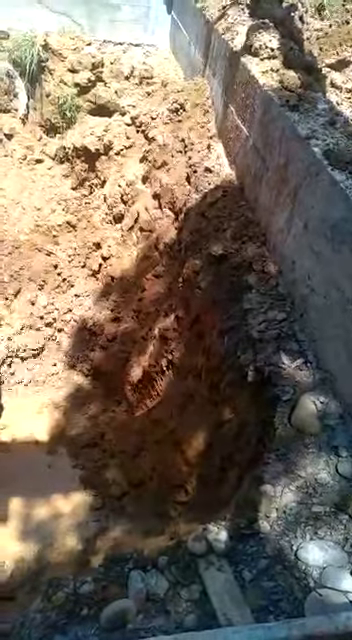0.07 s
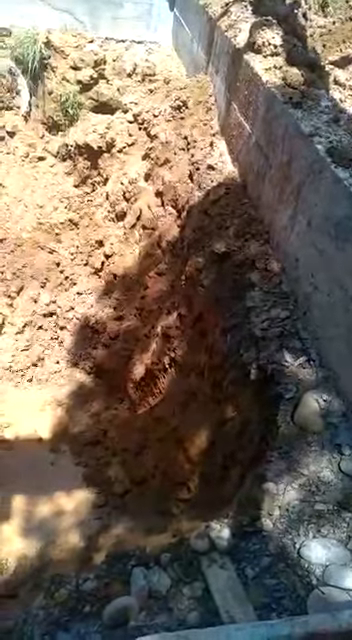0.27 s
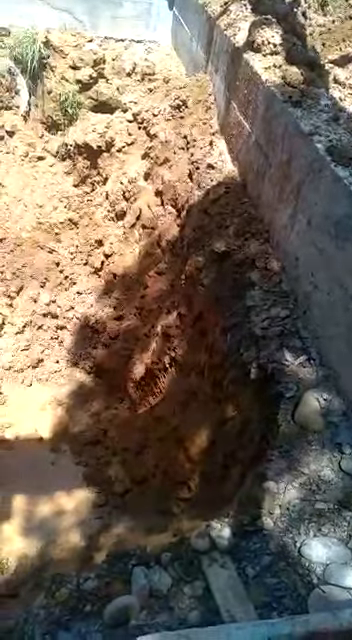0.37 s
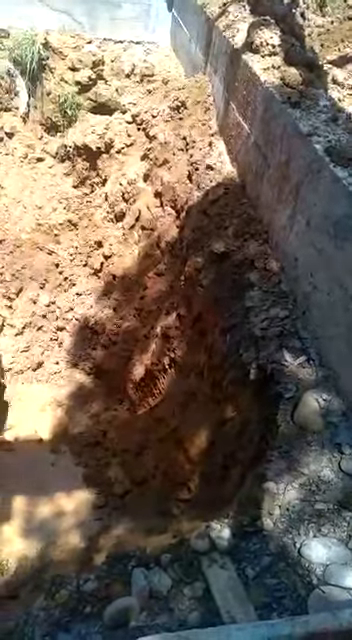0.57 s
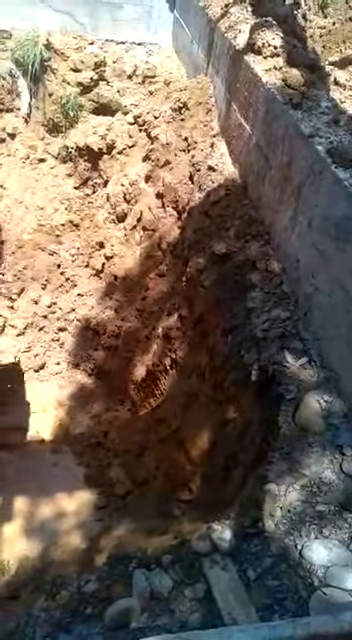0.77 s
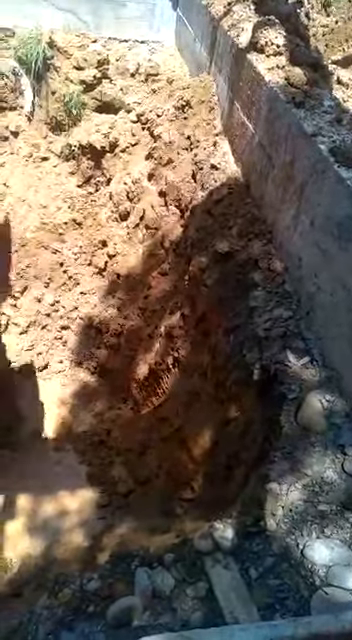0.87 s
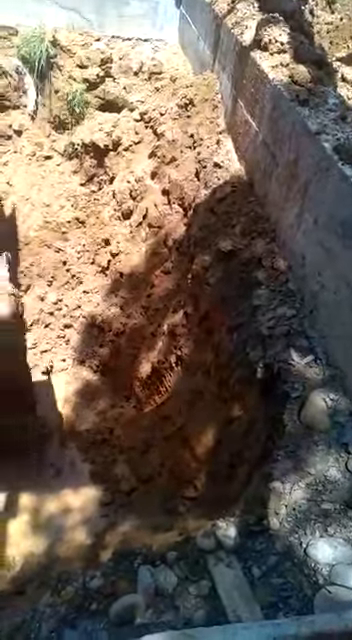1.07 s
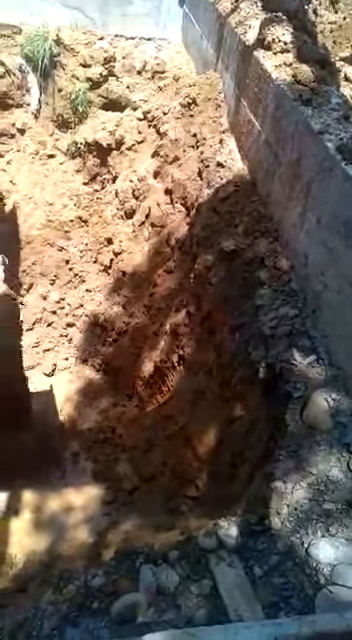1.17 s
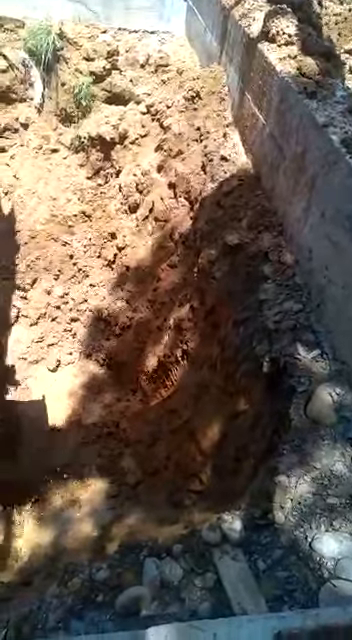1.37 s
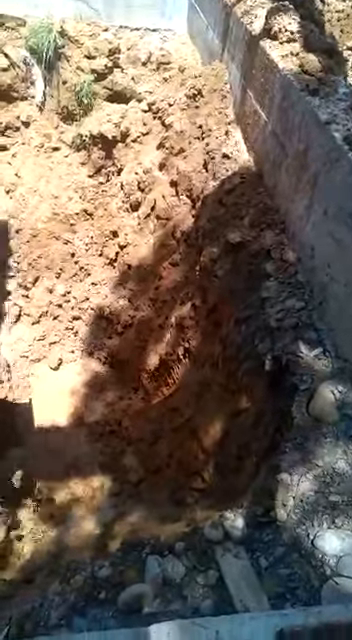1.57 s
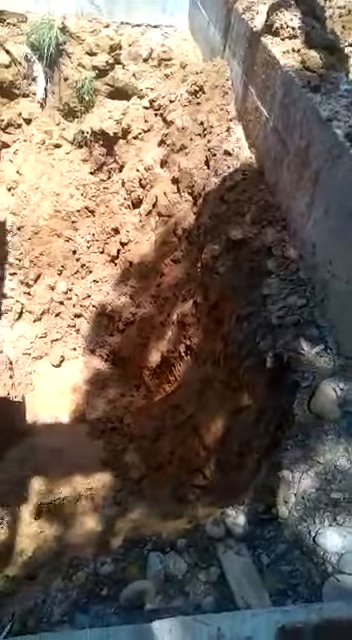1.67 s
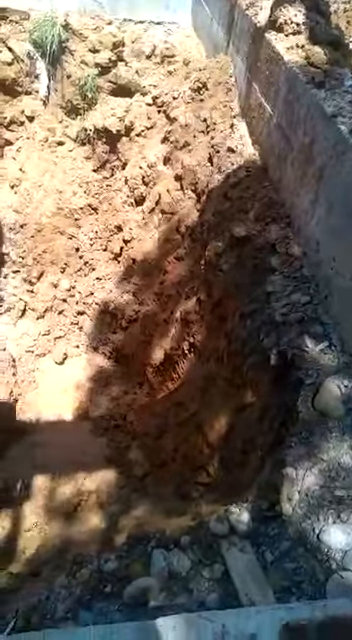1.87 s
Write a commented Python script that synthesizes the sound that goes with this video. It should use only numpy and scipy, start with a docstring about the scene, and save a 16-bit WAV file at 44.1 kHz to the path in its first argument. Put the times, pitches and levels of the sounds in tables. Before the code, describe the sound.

Uneven scrapes and thuds of a machine digging soil and stones, its engine rumbling low.

```python
"""Digging in a walled pit. An engine rumbles low throughout. First loose earth trickles down, a stone
creaks on hollow steel and sets it ringing, and a lump knocks. Then the blade bites in short, uneven
strokes: grit crunches along it, clods thud on the steel and stones tick. After a lull around one
second comes a second group of strokes. The walls return short echoes of the digging."""
import sys
import numpy as np
from scipy import signal
from scipy.fft import rfft, irfft, next_fast_len
from scipy.io import wavfile
from scipy.ndimage import uniform_filter1d

SR = 44100
rng = np.random.default_rng(int(sys.argv[2]) if len(sys.argv) > 2 else 0)


def generate_wav(sig):
    """Save sig (samples, or channels by samples) to the path in sys.argv[1] as 16-bit PCM at SR."""
    pcm = np.round(np.clip(np.atleast_2d(sig).T, -1, 1) * 32767).astype(np.int16)
    wavfile.write(sys.argv[1], SR, pcm)


N = 83790
TIME = np.arange(N) / SR

def from_db(db):
    """Amplitude grows tenfold every 20 dB."""
    return 10 ** (np.asarray(db) / 20)

def rms_one(x):
    """Normalisation to unit power."""
    return x / np.sqrt(np.mean(x ** 2) + 1e-20)

def even(x, over_s):
    """Division by the running rms holds the level near 1."""
    power = uniform_filter1d(np.mean(x ** 2, axis=0), max(int(over_s * SR), 2))
    return x / np.sqrt(np.abs(power) + 1e-12)

def colour(x, spectrum, power=1):
    """Minimum-phase filtering: folding the cepstrum makes the response causal."""
    size = 2 * next_fast_len(N)
    hz, db = np.transpose(spectrum)
    log_hz = np.log(np.maximum(np.fft.rfftfreq(size, 1 / SR), 1))
    gain = from_db(power * np.interp(log_hz, np.log(hz), db))
    cepstrum = irfft(np.log(gain))
    cepstrum[1:size // 2] *= 2
    cepstrum[size // 2 + 1:] = 0
    return irfft(rfft(x, size) * np.exp(rfft(cepstrum)))[..., :N]

# Stereo width. Each row: frequency in Hz, diffuse against direct sound in dB.
DIFFUSE_RATIO = [(300, -16), (900, 2), (2500, 1)]
def spread(direct, diffuse):
    """Partial coherence: left and right are alike in the bass, diffuse in the treble."""
    side = colour(diffuse, DIFFUSE_RATIO)
    return np.array([direct + side, direct - side])

def noise():
    """Gaussian noise, partly coherent in stereo."""
    return spread(*rng.standard_normal((2, N)))

def grains(per_s=2800, spread_db=1.5):
    """Shot noise: tiny contacts of random time and size."""
    sizes = from_db(spread_db * np.minimum(rng.exponential(1, (2, N)), 4))
    signs = rng.choice([-1, 1], (2, N))
    hits = rng.random((2, N)) < per_s / SR
    return spread(*(sizes * signs * hits))

def stroke(start, rise, t60, db, hold=0):
    """Exponential decay, 60 dB in t60 seconds, after a linear rise and a hold."""
    age = TIME - start
    attack = np.clip(age / max(rise, 1e-4), 0, 1)
    return attack * from_db(db - 60 * np.maximum(age - rise - hold, 0) / t60)

def ring(x, hz, t60):
    """A damped resonator: one mode driven by x."""
    r, w = from_db(-60 / (t60 * SR)), 2 * np.pi * hz / SR
    return signal.lfilter([1, -r * np.cos(w)], [1, -2 * r * np.cos(w), r * r], x + 1e-18)

def echoes(x, t60):
    """Reverberation: dense dying reflections, different on each side."""
    tail = rng.standard_normal((2, N)) * from_db(-60 * TIME / t60)
    return signal.fftconvolve(x, tail / np.linalg.norm(tail[0]), axes=1)[:, :N]

# Engine and far site noise. Each row: frequency in Hz, relative density in dB.
RUMBLE_SPECTRUM = [(25, -20), (100, -2), (155, 3), (200, -2), (450, -9.5), (1400, -21), (6000, -29.5),
                   (7600, -40.5), (15000, -45)]
# Engine tones. Each row: frequency in Hz, level in dB.
ENGINE_TONES = [(167, -48.5), (252, -49), (340, -50.5), (868, -53)]
def engine(rumble_db=-40.5):
    """Narrow resonances driven by noise give wavering tones over a broadband rumble."""
    rumble = from_db(rumble_db) * rms_one(colour(noise(), RUMBLE_SPECTRUM))
    shake = noise()
    hum = sum(from_db(db) * even(ring(shake, hz, t60=0.34), over_s=0.68) for hz, db in ENGINE_TONES)
    return rumble + hum

def trickle(ticks_per_s=150, tick_db=5):
    """Amplitude modulation: each larger grain adds a brief spurt to a steady flow of sand."""
    ticks = rng.uniform(0.17, 1, N) * (rng.random(N) < ticks_per_s / SR)
    return rms_one(1 + from_db(tick_db) * ring(ticks, hz=0, t60=0.014))

# Sand and finest dust. Each row: frequency in Hz, relative density in dB.
SAND_SPECTRUM = [(2000, -13), (4600, -1.5), (5500, 11), (6300, 9), (7000, 1), (7800, -11.5), (12000, -47)]
DUST_SPECTRUM = [(5000, -10), (7800, -16), (9300, -3), (15500, -18.5)]
# Sliding earth. Each row: start and hold in seconds, sand and dust levels in dB.
EARTH_SLIDES = [(0.03, 0.085, -48.5, -53), (0.427, 0.24, -43, -42), (0.887, 0.02, -40, -54),
                (1.105, 0.012, -40.5, -45), (1.2, 0.058, -48.5, -59), (1.263, 0.13, -37, -39)]
# Dry crumbs bursting. Each row: start in seconds, level in the sand band in dB.
CRUMB_BURSTS = [(0.151, -36.5), (.636, -37), (0.641, -37.5), (0.664, -42), (1, -39), (1.291, -29),
                (1.706, -45.5), (1.771, -45)]
def loose_earth(rise_s=0.018, t60_s=0.45, crumb_dust_db=-5):
    """Incoherent sources add in power: sliding earth hisses and bursting crumbs crackle."""
    sand = sum(stroke(start, rise_s, t60_s, db, hold) for start, hold, db, _ in EARTH_SLIDES)
    dust = sum(stroke(start, rise_s, t60_s, db, hold) for start, hold, _, db in EARTH_SLIDES)
    crumbs = sum(stroke(start, rise=0.00061, t60=0.033, db=db) for start, db in CRUMB_BURSTS)
    flow = trickle()
    sand_level = np.hypot(sand * flow, crumbs)
    dust_level = np.hypot(dust * flow, from_db(crumb_dust_db) * crumbs)
    return (sand_level * rms_one(colour(noise(), SAND_SPECTRUM))
            + dust_level * rms_one(colour(noise(), DUST_SPECTRUM)))

# A stone drags on steel. Each row: start and hold in seconds, first pitch in Hz, level in dB.
STONE_DRAGS = [(0.083, 0.035, 902, -39.5), (0.218, 0.026, 1558, -27.5), (0.463, 0.022, 1242, -24.5),
               (0.516, 0.032, 713.3, -22), (0.854, 0.015, 1572, -38), (1.325, 0.022, 1920, -29.5)]
def creaks(ring_s=0.0074, sag_octaves_per_s=6):
    """Stick-slip friction excites one broad resonance, which sinks as the stone slows."""
    out = 0
    for start, hold, hz, db in STONE_DRAGS:
        slips = grains() + 1j * grains()
        pitch = hz * 2 ** (-sag_octaves_per_s * np.clip(TIME - start, 0, 2 * hold))
        baseband = ring(ring(slips, 0, ring_s), 0, ring_s)
        rasp = baseband * np.exp(2j * np.pi * np.cumsum(pitch) / SR)
        out += stroke(start, rise=0.00091, t60=0.24, db=db, hold=hold) * even(rasp.real, over_s=0.023)
    return out

# Modes of the hollow steel. Each row: frequency in Hz, relative gain in dB.
STEEL_MODES = [(341, -0.5), (405, -4.5), (613, -16), (730, 5), (1066, 7), (1174, -2), (2015, 4.5),
               (2935, -3), (4342, -16), (4556, -4), (4631, 6.5)]
def steel(contacts, gain_db=-59, lowest_t60_s=0.46, damping_exponent=0.49):
    """Modal resonance: every contact rings the same modes, and high ones die sooner."""
    lowest_hz = STEEL_MODES[0][0]
    return sum(from_db(gain_db + db) * ring(contacts, hz, lowest_t60_s * (lowest_hz / hz) ** damping_exponent)
               for hz, db in STEEL_MODES)

# Lumps and rocks knock. Each row: start in seconds, level in dB, pitch in Hz.
LUMP_KNOCKS = [(0.15, -30.5, 155), (.235, -19, 300), (0.253, -15, 1290), (0.259, -24.5, 130),
               (0.267, -18.5, 1020), (.319, -24, 135), (0.578, -25.5, 132), (1.449, -32, 125),
               (1.575, -28, 255)]
def knocks(rise_s=0.0094, t60_s=0.07):
    """Damped vibration: each lump sounds one note, higher and shorter for smaller ones."""
    out = 0
    for start, db, hz in LUMP_KNOCKS:
        size = np.sqrt(LUMP_KNOCKS[0][2] / hz)  # relative to the first lump
        note = np.sin(2 * np.pi * (hz * TIME + rng.random()))
        out += stroke(start, rise_s * size, t60_s * size, db) * note
    return out

# Coarse and fine grit. Each row: frequency in Hz, relative density in dB.
COARSE_SPECTRUM = [(70, -68), (400, -7), (720, 3.5), (1200, 2.5), (2600, -3), (6000, -53)]
FINE_SPECTRUM = [(120, -55), (1500, 0), (2800, 5.5), (4500, 3), (5800, -0.5), (6600, -8), (7600, -24),
                 (15000, -57)]
# Blade strokes. Each row: start, rise and t60 in seconds, coarse and fine grit levels in dB.
BLADE_STROKES = [(0.209, 0.012, 0.28, -26.5, -27), (0.229, 0.019, 0.16, -23.5, -53),
                 (0.312, 0.019, 0.16, -32.5, -40.5), (0.431, 0.014, 0.11, -20, -30),
                 (0.45, 0.013, 0.23, -24.5, -18), (0.498, 0.019, 0.28, -49, -20.5),
                 (0.518, 0.0056, 0.38, -20.5, -58), (0.688, 0.0047, 0.19, -28.5, -17.5),
                 (.778, 0.015, 0.082, -40, -37), (0.879, 0.0025, 0.2, -36.5, -34),
                 (.917, 0.014, 0.12, -62, -34.5), (1.264, 0.031, 1, -50, -29.5),
                 (1.321, 0.029, 0.18, -19.5, -36), (1.496, 0.012, 0.49, -41, -63),
                 (1.532, 0.043, 0.11, -33, -36)]
def scrapes(blade_t60_s=0.006):
    """Granular friction: grit crunches, and the blade's dense, soil-damped modes colour the fine part."""
    coarse = sum(stroke(start, rise, t60, db) for start, rise, t60, db, _ in BLADE_STROKES)
    fine = sum(stroke(start, rise, t60, db) for start, rise, t60, _, db in BLADE_STROKES)
    coarse_grit = colour(grains(), COARSE_SPECTRUM)
    fine_grit = echoes(colour(grains(), FINE_SPECTRUM), blade_t60_s)
    return coarse * even(coarse_grit, over_s=0.013) + fine * even(fine_grit, over_s=0.015)

# The hollow thud. Each row: frequency in Hz, relative density in dB.
THUD_SPECTRUM = [(45, -47.5), (270, -14.5), (340, 4), (450, 0.5), (800, -28), (2000, -54.5)]
# Clods land on steel. Each row: start, rise and t60 in seconds, level in dB.
CLOD_LANDINGS = [(.234, 0.011, 0.15, -24), (0.431, 0.023, 0.15, -21.5), (0.516, 0.023, 0.094, -19.5),
                 (0.693, 0.011, 0.091, -27.5), (1.326, 0.0056, 0.14, -26.5), (1.553, 0.036, 0.13, -20),
                 (1.611, 0.014, 0.5, -37.5), (1.755, 0.029, 0.053, -36.5)]
def clods():
    """Inelastic impact: a clod crumbles into many small contacts that merge in a rough thud."""
    envelope = sum(stroke(*landing) for landing in CLOD_LANDINGS)
    return envelope * even(colour(grains(), THUD_SPECTRUM), over_s=0.0194)

# Stones tick on the blade. Each row: start in seconds, crack level in dB, ping pitch in Hz.
STONE_TICKS = [(0.4428, -13.5, 3245), (0.514, -21, 4460), (0.6881, -23.5, 4450), (1.12, -34, 3300),
               (1.268, -32.5, 5350), (1.433, -34.5, 5480)]
def stones(rise_s=0.00061, crack_t60_s=0.036, ping_t60_s=0.029, ping_db=7.5):
    """Hard impact: a brief contact gives a broadband crack and a ping of its own pitch."""
    crack = rms_one(colour(noise(), FINE_SPECTRUM))
    out = 0
    for start, db, hz in STONE_TICKS:
        ping = np.sin(2 * np.pi * (hz * TIME + rng.random((2, 1))))
        out += stroke(start, rise_s, crack_t60_s, db) * crack
        out += stroke(start, rise_s, ping_t60_s, db + ping_db) * ping
    return out

def scene(pit_db=-34, pit_t60_s=0.35):
    """Superposition: the digging, its reflections from the pit walls, loose earth and the engine."""
    contacts = scrapes() + creaks() + clods()
    digging = contacts + steel(contacts) + stones() + knocks()
    return digging + from_db(pit_db) * echoes(digging, pit_t60_s) + loose_earth() + engine()

# Microphone imbalance. Each row: frequency in Hz, leftward lean in dB before each side's scaling.
MICROPHONE_LEAN = [(60, 2), (4000, 4.5), (5000, 13), (6200, 16.5), (8800, -5.5), (12000, 2)]
def record(dry, cutoff_hz=15800):
    """Each microphone has its own frequency response; saturation rounds peaks and a low-pass follows."""
    left = colour(dry[0], MICROPHONE_LEAN, power=0.56)
    right = colour(dry[1], MICROPHONE_LEAN, power=-0.66)
    lowpass = signal.ellip(12, 0.1, 80, cutoff_hz, fs=SR, output="sos")
    return signal.sosfilt(lowpass, np.tanh([left, right]))

dry = scene()
out = record(dry)
generate_wav(out)
```